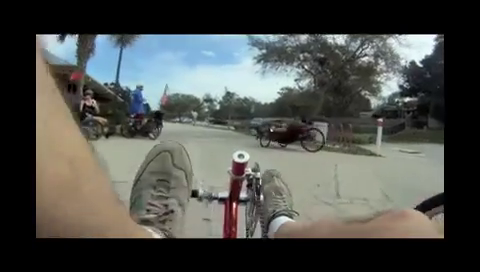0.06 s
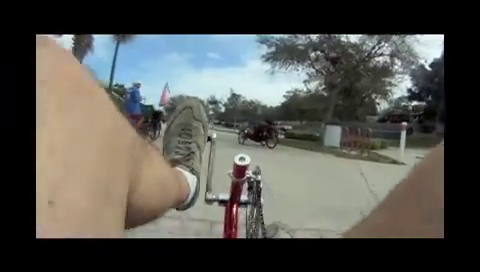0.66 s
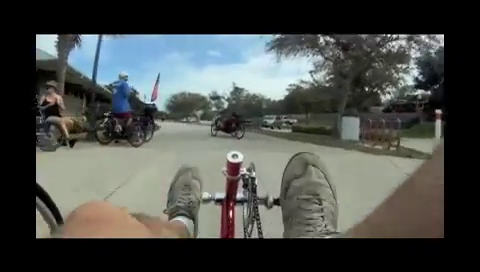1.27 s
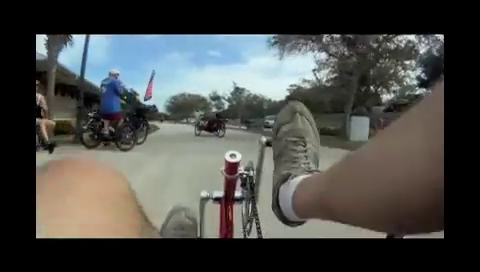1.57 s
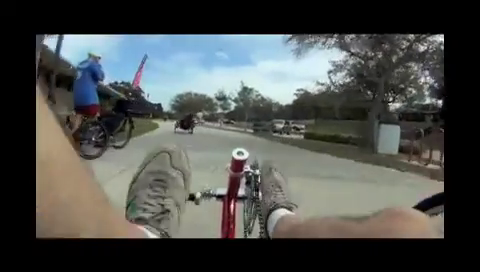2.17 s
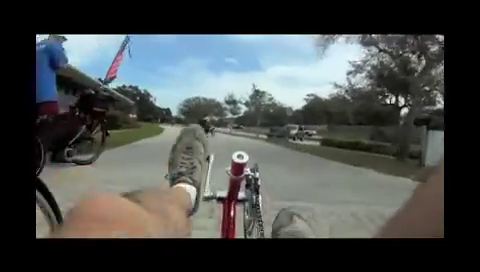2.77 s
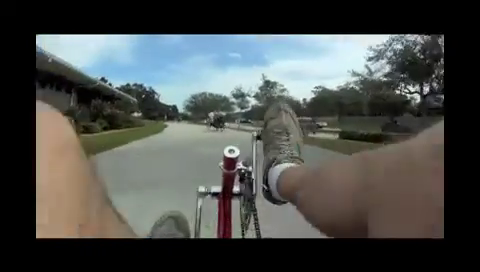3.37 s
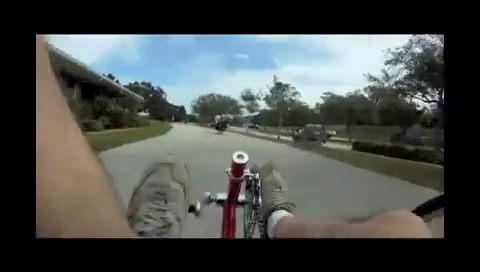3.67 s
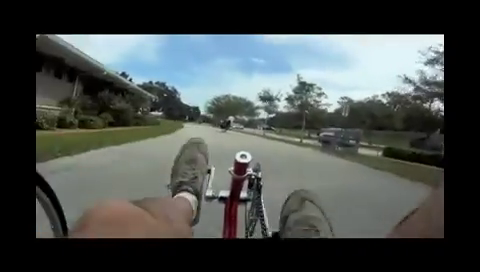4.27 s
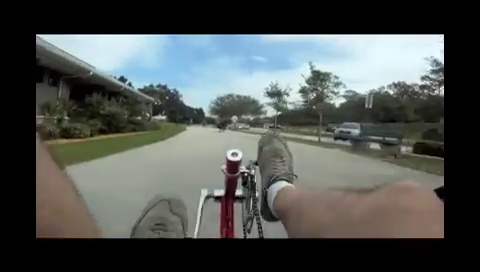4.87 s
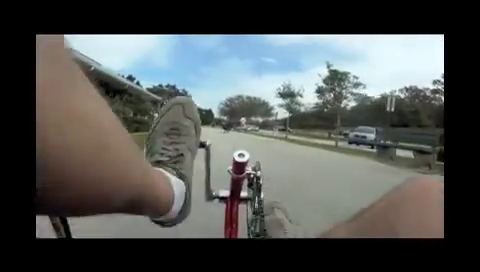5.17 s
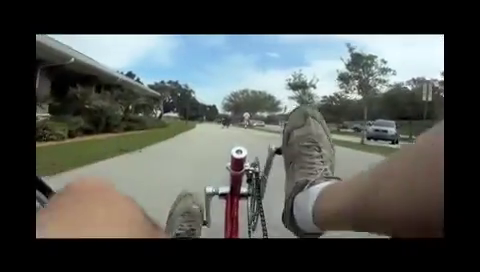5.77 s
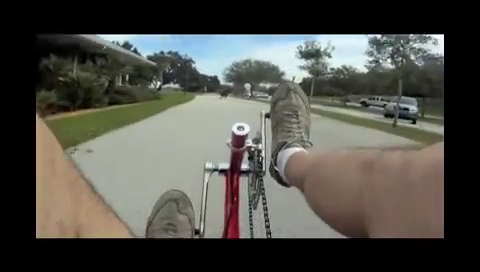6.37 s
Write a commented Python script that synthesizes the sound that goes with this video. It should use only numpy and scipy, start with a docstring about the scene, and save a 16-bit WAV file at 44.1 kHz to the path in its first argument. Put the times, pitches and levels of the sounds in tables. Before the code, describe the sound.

A recumbent pedal trike gathers speed on a paved trail, heard from a small microphone on its frame. A low rumble and a rush of air and tyres build while the chain ticks and rattles lightly. Just before the middle, bumps give a quick cluster of knocks. The rumble then grows heavier, with a few soft clonks from pedalling and faint clicks of grit under the tyres.

```python
"""On a paved trail, a recumbent pedal trike gathers speed, heard by a small camera on its frame.
The pavement shakes the frame into a low boom, air and tyres rush, and the chain rattles and ticks.
Bumps knock the camera's case, grit and stones click under the tyres, and the pedals clonk the frame.
Faint chirps come near the end. The recorder adds a slight fizz and a few sharp snaps."""
import sys
import numpy as np
from scipy import signal
from scipy.fft import rfft, irfft
from scipy.io import wavfile
from scipy.ndimage import uniform_filter1d

SR = 44100
rng = np.random.default_rng(int(sys.argv[2]) if len(sys.argv) > 2 else 0)


def put_to_file(sound):
    """Save the sound as 16-bit audio at rate SR, in the file named by the first command-line argument."""
    columns = np.atleast_2d(sound).T  # one column per channel
    safe = np.clip(columns, -1, 1)
    whole_steps = np.round(safe * 32767)
    wavfile.write(sys.argv[1], SR, whole_steps.astype(np.int16))


N = 283563
T = np.arange(N) / SR

# the tones the camera's case and mount ring at (pitch [Hz], time to fade by 60 dB [s], level [dB])
CASE_TONES = [(640, 0.04, 4), (683, 0.064, -15), (956, 0.027, -3.5), (1034.5, 0.02, 0.5),
              (1678, 0.012, -3.5), (2069, 0.021, -2.5), (2350, 0.04, -6.5), (2695, 0.068, -13.5),
              (2690, 0.082, -17.5), (3130, 0.048, -12), (3566, 0.02, 2.5), (3900, 0.042, -12.5)]
# the middles of the case's four ranges: thud, clack, click and edge (pitch [Hz])
RANGES_HZ = [650, 1000, 2100, 3600]


def undb(db):
    """Turn decibels into a number to multiply by."""
    return 10 ** (np.asarray(db) / 20)


def unit(x):
    """Scale a sound to an average (rms) level of 1."""
    return x / np.sqrt(np.mean(x ** 2))


def curves(table):
    """Join a table's points with straight lines in time, one curve for each level column."""
    times, *columns = np.transpose(table)
    return [np.interp(T, times, column) for column in columns]


def noise(spectrum):
    """Noise of level 1, its lows and highs shaped by a table."""
    hz, db = np.transpose(spectrum)
    f = np.fft.rfftfreq(N, 1 / SR) + 1
    gain = undb(np.interp(np.log(f), np.log(hz), db, right=-120))
    return unit(irfft(rfft(rng.standard_normal(N)) * gain, N))


def band(hz, width_hz):
    """Noise of level 1, gathered closely around one pitch."""
    f = np.fft.rfftfreq(N, 1 / SR) + 1
    off_pitch = (f * f - hz * hz) / (f * width_hz)
    return unit(irfft(rfft(rng.standard_normal(N)) / (1 + 1j * off_pitch) ** 2, N))


def drift(turns_per_s):
    """A smooth random wobble, typically about 1 in size."""
    hold = int(SR / turns_per_s)
    steps = np.repeat(rng.standard_normal(N // hold + 1), hold)
    return 1.47 * uniform_filter1d(uniform_filter1d(steps, hold), hold)[:N]


def add(out, s, sound):
    """Mix a short sound in, s seconds from the start."""
    i = int(s * SR)
    out[i:i + len(sound)] += sound[:N - i]


def click(hz, cycles):
    """A dry burst that peaks after the given number of cycles and quickly dies."""
    t = T[:SR // 100]
    age = t * hz / cycles
    return age * np.exp(1 - age) * np.sin(2 * np.pi * hz * t)


def case_ring(shares_db, detune=0.0047, travel_s=0.0015, contact_s=0.00022):
    """The case rings after one blow; where it is hit sets each range's share of the sound."""
    hz, fade_s, db = np.transpose(CASE_TONES)[:, :, None]
    gain = undb(db + np.interp(np.log(hz), np.log(RANGES_HZ), shares_db))
    # the blow travels as a bend in the frame, so low tones arrive later
    delay_s = travel_s * (np.sqrt(hz[0] / hz) - np.sqrt(hz[0] / hz[-1]))
    t = np.maximum(T[:SR // 12] - delay_s, 0)
    hz = hz * (1 + detune * rng.standard_normal(hz.shape))
    rise = 1 - np.exp(-(t / contact_s) ** 2)
    fade = np.exp(-np.log(1000) * t / fade_s)
    return np.sum(rise * gain * fade * np.sin(2 * np.pi * hz * t), axis=0)


def pedalling():
    """The rider's push: 1 at its hardest, -1 at its lightest."""
    # marks that shape the push: steady at first, then slow, uneven swells (time [s])
    marks = [1.5, -0.03, -2.03, 0, 2.5, 5, 9.5, 3.5, 4, 6.6]
    return np.cos(2 * np.pi * np.interp(T, marks, np.arange(len(marks))))


def frame_boom(hz=119, width_hz=34, wander=0.045):
    """The frame bounces on its tyres: raggedly on plain pavement, in clear swells on rough patches."""
    # the pavement's constant shaking of the frame (time [s], level [dB])
    shaking = [(0.0, -46.5), (0.45, -48.5), (0.6, -40.5), (2.4, -41), (3.2, -33.5), (3.9, -32.5),
               (4.8, -36.5), (5.6, -34.5), (6.43, -35.5)]
    # rough patches of pavement (time [s], length [s], level [dB])
    patches = [(0.242, 0.063, -35.5), (0.774, 0.067, -37), (1.078, 0.032, -34), (1.22, 0.04, -32.5),
               (1.47, 0.05, -37), (2.504, 0.063, -29.5), (2.74, 0.16, -32.5), (3.055, 0.048, -27),
               (3.298, 0.1, -32), (3.525, 0.14, -27.5), (3.693, 0.085, -24), (4.147, 0.11, -27),
               (4.315, 0.12, -24.5), (4.613, 0.12, -30), (4.783, 0.071, -28.5), (5.275, 0.033, -27.0),
               (5.876, 0.13, -28)]
    boom_db, = curves(shaking)
    phase = 2 * np.pi * np.cumsum(hz * (1 + wander * drift(22))) / SR
    power = sum(undb(db - 0.93) ** 2 / 2 ** ((2 * (T - s) / length) ** 2) for s, length, db in patches)
    ragged = band(hz, width_hz) * undb(boom_db - 2)
    return ragged + unit(np.sin(phase)) * np.sqrt(power)


def rolling(rumble_db, rush_db, flutter_db=2.0):
    """The road rumbles under the fluttering rush of air and tyres."""
    # the road's deep rumble (pitch [Hz], level [dB])
    rumble_shape = [(12, -14), (25, -2.5), (45, -3.5), (62, 0), (85, -1.5), (105, -3.5), (160, -4.5),
                    (200, -35.5), (300, -41.5)]
    # the rush of air and tyres (pitch [Hz], level [dB])
    rush_shape = [(120, -18.5), (180, 8.5), (260, 2), (400, 2), (520, -0.5), (700, -4), (850, -8),
                  (1100, -23), (1350, -28), (2000, -24.5), (3000, -27), (4200, -41.5), (6000, -49.5)]
    rumble = noise(rumble_shape) * undb(rumble_db - 0.35)
    rush = noise(rush_shape) * undb(rush_db - 0.5 + flutter_db * drift(30))
    return rumble + rush


def chain(rattle_db, blows_per_s=260, scatter_db=6.5, colour_db=4):
    """Links drop onto the cogs and guide wheels: many small blows, each ringing the case its own way."""
    # the chain grinds briefly under a pedal stroke (time [s], length [s], rise [dB])
    grinds = [(0.186, 0.05, 13.5), (0.748, 0.035, 6), (1.23, 0.039, 17.5), (1.427, 0.062, 15),
              (2.07, 0.02, 6), (2.222, 0.11, 6.5), (2.605, 0.069, 10)]
    grind_db = sum(db * np.exp(-(2 * (T - s) / length) ** 4) for s, length, db in grinds)
    link_lands = rng.random(N) < blows_per_s / SR
    blows = link_lands * undb(scatter_db * np.minimum(rng.exponential(size=N), 3.5))
    t, out = T[:SR // 16], np.zeros(N)
    rise = 1 - np.exp(-t / 0.0004)
    for hz, fade_s, db in CASE_TONES:
        tone = rise * np.exp(-np.log(1000) * t / fade_s) * np.sin(2 * np.pi * hz * t)
        share_db = np.interp(np.log(hz), np.log(RANGES_HZ), [2, -1, 0, -15])  # thud, clack, click, edge
        mix = np.sign(rng.standard_normal(N)) * undb(colour_db * (2 * rng.random(N) - 1))
        out += undb(db + share_db) * signal.oaconvolve(blows * mix, tone)[:N]
    return unit(out) * undb(rattle_db + grind_db + 8.5 + drift(35))


def whirr():
    """The running chain keeps the cogs faintly ringing."""
    # the cogs' steady metallic tones (pitch [Hz], width [Hz], level [dB])
    cog_tones = [(2182, 300, -72), (2808, 150, -80.5)]
    return sum(undb(db) * band(hz, width) for hz, width, db in cog_tones)


def outdoor_air(level_db=-62):
    """The open air makes a quiet, even hiss."""
    # the air's hiss (pitch [Hz], level [dB])
    hiss_shape = [(200, 0), (330, -13), (480, 6.5), (630, 14.5), (780, 7.5), (980, -2.5), (1300, -23),
                  (2200, -16), (3000, -23.5), (4500, -27), (6000, -28.5)]
    return undb(level_db) * noise(hiss_shape)


def grit(rush_db, low_hz=1600, high_hz=4100, db_per_octave=-6, count=420):
    """Sand grains crack under the tyres, each at its own pitch, louder with speed."""
    out = np.zeros(N)
    for when, pitch, smallness in rng.random((count, 3)):
        hz = low_hz * (high_hz / low_hz) ** pitch
        size_db = -11 - 5.5 * np.log(smallness + 0.04)  # many soft grains, a few loud ones
        db = rush_db[int(when * N)] + size_db + db_per_octave * np.log2(hz / low_hz)
        add(out, when * N / SR, undb(db) * click(hz, cycles=0.61))
    return out


def link_tick(hz, bounce_s=0.0011, bounce_db=-7):
    """A link snaps onto a tooth and bounces; some of the blow rings the case."""
    out = undb(-9) * case_ring(shares_db=[0, -1, 0, -12], detune=0.04)
    hit = click(hz, cycles=0.87)
    add(out, 0, hit)
    add(out, bounce_s * (.5 + rng.random()), undb(bounce_db) * hit)
    return out


def chain_ticks(rattle_db, stray_db=18, scatter_db=2.5, stray_hz=2000, spread_octaves=0.25, count=32):
    """Links tick loudly now and then; softer stray ticks come unevenly and grow with the rattle."""
    # the loudest chain and gear ticks (time [s], level [dB], pitch [Hz])
    loud_ticks = [(0.5493, -31, 2230), (0.8248, -42, 1950), (1.1737, -34, 2010), (1.2018, -41, 1930),
                  (1.4117, -48, 2020), (1.6788, -40.5, 2140), (1.7884, -38.5, 1980), (1.8553, -40, 2000),
                  (1.9837, -44.5, 2090), (2.6083, -30.5, 1940), (2.7245, -39, 1890), (2.8738, -38, 2020),
                  (3.2614, -35.5, 2040), (3.3796, -38.5, 1660), (3.4606, -35.5, 1750), (3.57, -36, 2100),
                  (3.8516, -32, 1950), (4.0115, -36, 1710), (4.0938, -35, 1640), (4.2027, -36.5, 2080),
                  (4.5552, -39.5, 2260), (4.7929, -40.5, 1870), (5.2056, -40, 1680), (5.2819, -38.5, 1730),
                  (6.0344, -34.5, 2120), (6.0889, -34, 2400)]
    out = np.zeros(N)
    for s, db, hz in loud_ticks:
        add(out, s, undb(db) * link_tick(hz))
    for k, (when, size, pitch) in enumerate(rng.random((count, 3))):
        i = int((k + when) / count * N)
        db = rattle_db[i] + stray_db + scatter_db * (2 * size - 1)
        hz = stray_hz * 2 ** (spread_octaves * (2 * pitch - 1))
        add(out, i / SR, undb(db) * link_tick(hz))
    return out


def knocks(crack_hz=1880, crack_db=-8, bounce_s=0.0038, bounce_db=-16):
    """Bumps knock the case on its mount: a dry crack, a ring and one bounce. Harder contact is brighter."""
    # bumps in the trail (time [s], level [dB], brightness [dB per octave])
    bumps = [(0.152, -42.5, -11), (0.707, -47.5, -1), (0.784, -44, -4), (1.226, -40.5, 2.5),
             (1.387, -43, -13), (1.963, -37, -11), (2.564, -39, 3.5), (2.627, -22, -1), (2.66, -28, -5.5),
             (2.737, -20.5, 0), (2.762, -25, -6.5), (2.934, -22.5, -1), (3.336, -38, -6), (4.625, -42, 5.5),
             (5.399, -43, -2), (6.085, -40, 4.5)]
    # a knock's share of thud, clack, click and edge (level [dB])
    knock_shares = [-0.5, -1.5, -11, -22]
    octaves = np.log2(np.divide(RANGES_HZ, RANGES_HZ[0]))
    out = np.zeros(N)
    for s, db, brightness in bumps:
        shares_db = knock_shares + brightness * octaves
        add(out, s, undb(db) * case_ring(shares_db))
        add(out, s, undb(db + crack_db + brightness) * click(crack_hz, cycles=1.56))
        add(out, s + bounce_s, undb(db + bounce_db) * case_ring(shares_db))
    return out


def snaps(settle_s=0.0018):
    """The recorder's signal jumps in one step and settles back: a dry, sharp snap."""
    # sudden jumps in the signal (time [s], level [dB])
    jumps = [(1.3285, -37), (1.595, -30), (2.0960, -45), (3.2971, -24.5), (3.7975, -33.5)]
    out = np.zeros(N)
    for s, db in jumps:
        add(out, s, -undb(db) * np.exp(-T[:SR // 50] / settle_s))
    return out


def pebbles():
    """A tyre pings a small stone away: a thin, bright click."""
    # stones hit by a tyre (time [s], level [dB])
    stones = [(1.8338, -47), (1.8664, -45.5), (1.9116, -46.5), (2.228, -48.5), (3.0575, -45), (3.4804, -38),
              (3.5156, -39), (3.8198, -43), (4.1143, -39), (4.1495, -38.5), (4.2346, -43.5), (4.535, -42.5),
              (5.4511, -39.5)]
    out = np.zeros(N)
    for s, db in stones:
        add(out, s, undb(db) * click(hz=3400, cycles=0.8))
    return out


def clonks():
    """A slow push on the frame lets the case's middle tones sing out."""
    # soft clonks of the frame under the pedals (time [s], level [dB])
    pushes = [(2.058, -38.5), (2.159, -39), (3.5765, -23), (4.2105, -23), (5.843, -27)]
    out = np.zeros(N)
    for s, db in pushes:
        add(out, s, undb(db) * case_ring(shares_db=[-5, 4, -17, -19], contact_s=0.0031))
    return out


def chirps():
    """Four soft, high chirps, perhaps a far bird."""
    # short swells of high noise (time [s], length [s], level [dB])
    calls = [(5.037, 0.05, -65), (5.14, 0.038, -67.5), (5.584, 0.035, -60.5), (5.675, 0.055, -67.5)]
    swells = sum(undb(db) * np.exp(-(2 * (T - s) / length) ** 2) for s, length, db in calls)
    return swells * band(hz=4000, width_hz=700)


def scene(push_rumble_db=4.5, push_chain_db=4, low_cut_hz=470):
    """The trike rolls through quiet air; the rider's push swells the rumble and the chain."""
    # the ride as it gathers speed (time [s], road rumble [dB], rush of air and tyres [dB])
    ride = [(0, -51.5, -64.5), (0.45, -46.5, -62.0), (1.1, -44.5, -59.0), (1.5, -46.0, -55.0),
            (1.8, -39.0, -52.5), (2.3, -41.5, -45.0), (2.5, -38.5, -48.5), (3.1, -37.0, -45.5),
            (3.45, -33.5, -44.5), (4.05, -31.5, -40.5), (4.4, -36.0, -44.5), (4.85, -35.5, -44.5),
            (5.1, -33.5, -40.5), (6.15, -34.5, -40.5), (6.43, -38.5, -42.5)]
    # the running chain's rattle (time [s], level [dB])
    rattle = [(0.0, -71.5), (0.3, -76.5), (0.75, -69), (1.05, -78), (1.63, -74), (1.74, -65), (3.56, -63.5),
              (6.23, -63.5), (6.43, -55)]
    rumble_db, rush_db = curves(ride)
    rattle_db, = curves(rattle)
    push = pedalling()
    rattle_db += push_chain_db * push
    road = frame_boom() + rolling(rumble_db + push_rumble_db * push, rush_db)
    blows = chain(rattle_db) + chain_ticks(rattle_db) + knocks() + clonks() + grit(rush_db) + pebbles()
    # the stiff case lets through little of a blow below its lowest tone
    blows = signal.sosfilt(signal.butter(3, low_cut_hz, "high", fs=SR, output="sos"), blows)
    return (road + blows + whirr() + chirps() + outdoor_air())[None]


def record(dry, sound_top_hz=5500, step_hz=12000, fizz_db=-10, output_top_hz=15500):
    """The recorder cuts the highs, then its coarse steps add a faint, high fizz; its snaps come in last."""
    sound = signal.sosfilt(signal.ellip(8, .2, 70, sound_top_hz, fs=SR, output="sos"), dry)
    # the steps mirror the sound on both sides of their own rate, more weakly towards the top
    slope = np.gradient(sound, axis=1) * SR
    mirrored = slope / (np.pi * step_hz) * np.cos(2 * np.pi * step_hz * T)
    fall = np.maximum(np.fft.rfftfreq(N, 1 / SR) / step_hz, .5) ** -2.4
    fizz = undb(fizz_db) * irfft(rfft(mirrored) * fall, N)
    top_cut = signal.ellip(8, .2, 70, output_top_hz, fs=SR, output="sos")
    return signal.sosfilt(top_cut, sound + fizz + snaps())


dry = scene()
out = record(dry)
put_to_file(out)
```